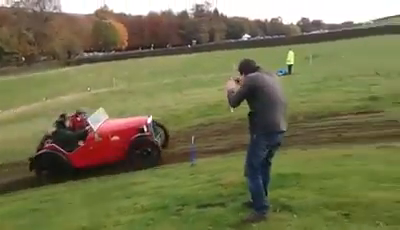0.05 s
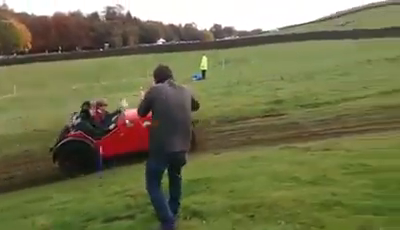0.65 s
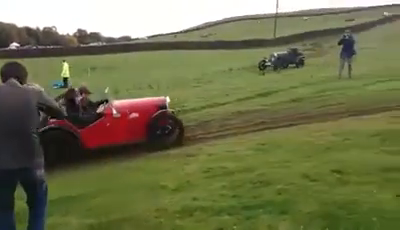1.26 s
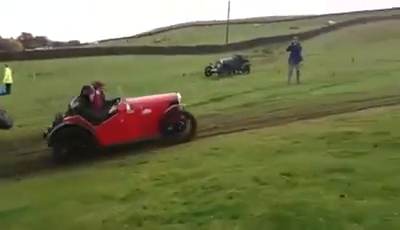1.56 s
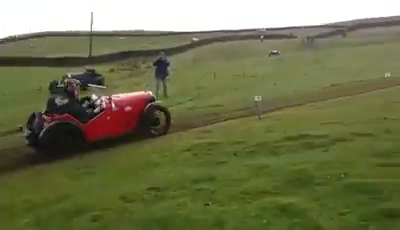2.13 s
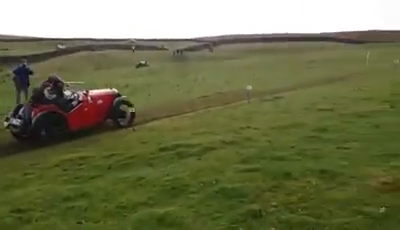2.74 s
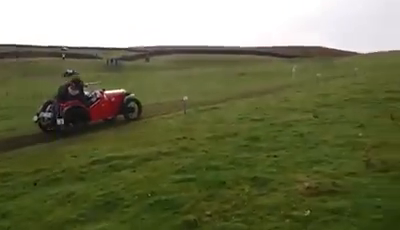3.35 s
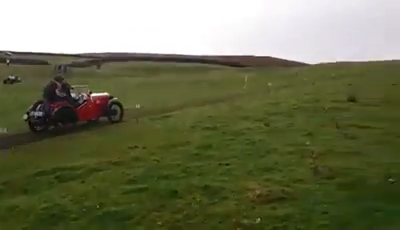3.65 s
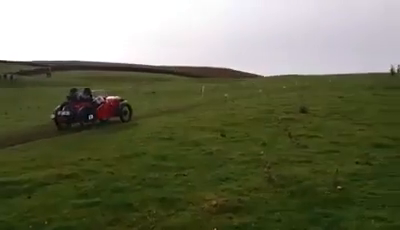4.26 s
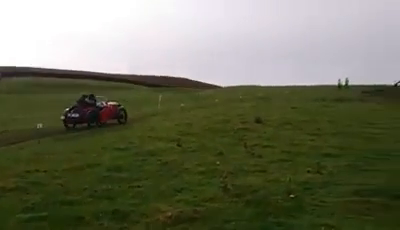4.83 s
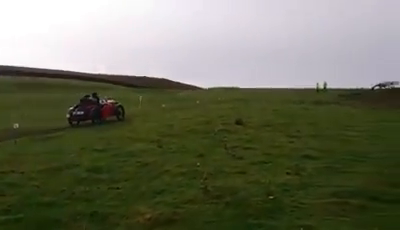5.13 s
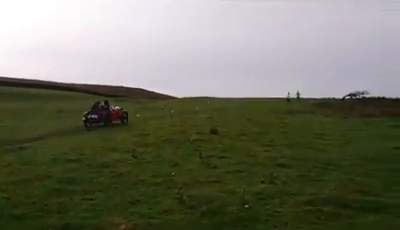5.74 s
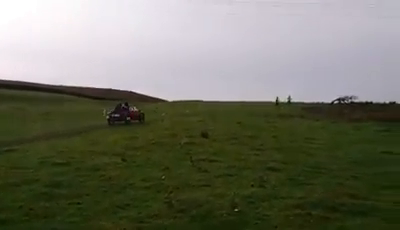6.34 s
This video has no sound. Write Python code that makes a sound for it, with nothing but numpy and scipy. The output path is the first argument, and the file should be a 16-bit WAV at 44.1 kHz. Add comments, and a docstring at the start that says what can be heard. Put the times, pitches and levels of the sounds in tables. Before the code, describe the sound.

A small vintage four-cylinder car is already at full throttle, climbing a muddy hill outdoors. Its exhaust booms, barks and rasps at a nearly steady pitch, with rushing gas and the hiss of flung mud. It passes closest at about 1 second, and loose metal buzzes strongly between 1 and 2.5 seconds. The low boom peaks around 2.5 seconds, then the car gradually draws away and the hiss and rasp fade. From 2.7 to 5.8 seconds, short, bright metal clanks come in irregular clusters. At about 5.4 seconds the driver eases off and the pitch drops, the engine running on more quietly until the end at 6.5 seconds. Behind it a dull second engine idles, revving gently around 5 seconds, over a faint murmur of far-off motors. Gusts rumble and thud on the hand-held stereo microphone, mostly on the right, at about 1, 2 and 3 seconds.

```python
"""A small vintage four-cylinder car climbs a muddy hill at full throttle, passes and draws away.
Its uneven firings boom, bark and rasp in the exhaust; near the end the driver eases off.
Gas rushes through the engine, spinning tyres fling mud, and loose metal buzzes and clanks.
Behind it a second engine idles, far-off motors murmur and gusts buffet a hand-held stereo microphone."""
import sys
import numpy as np
from scipy import signal
from scipy.fft import rfft, irfft
from scipy.io import wavfile

SR = 44100
rng = np.random.default_rng(int(sys.argv[2]) if len(sys.argv) > 2 else 0)


def transcribe(signal):
    """Save signal, clipped to [-1, 1], as a 16-bit WAV file at the path in sys.argv[1]."""
    frames = np.atleast_2d(signal).T
    limited = np.clip(frames, -1, 1)
    pcm = np.round(limited * 32767).astype(np.int16)
    wavfile.write(sys.argv[1], SR, pcm)


N = 286209
TIME, FREQ = np.arange(N) / SR, np.arange(N // 2 + 1) * SR / N


# How fast the engine runs; one cycle is four firings: (time [s], cycle rate [Hz])
ENGINE_SPEED = [(0.0, 39.46), (0.12, 39.65), (0.5, 37.86), (0.81, 38.23), (1.03, 37.58), (1.43, 39.41),
                (2.04, 39.1), (2.44, 38.58), (3.42, 39.54), (3.8, 38.76), (4.03, 39.04), (4.36, 38.13),
                (4.9, 38.87), (5.06, 38.08), (5.42, 37.9), (5.64, 34.62), (6.0, 35.62), (6.49, 36.6)]
def engine_cycles(wobble=0.00346):
    """Count the engine's cycles so far; its speed wobbles as the wheels grip and slip."""
    hz = curves(ENGINE_SPEED)[0] * (1 + wobble * wander(11.9))
    return np.cumsum(hz) / SR


# The four cylinders in firing order: (place in the cycle [0-1], strength [dB])
CYLINDERS = [(0.17, 0.5), (0.43, 6), (0.695, 3.2), (0.928, 1.5)]
def firings(cycles, jitter, scatter_db):
    """One pulse per firing, each a little early or late, weak or strong."""
    place, db = np.transpose(CYLINDERS)
    whole = np.arange(int(cycles[-1]))
    chance = rng.standard_normal((300, 2, len(place)))[:len(whole)]
    due = whole[:, None] + place + jitter * chance[:, 0]
    samples = np.interp(due, cycles, np.arange(N)).astype(int)
    return np.bincount(samples.ravel(), gain(db + scatter_db * chance[:, 1]).ravel(), N)


def harmonic(cycles, multiple, lean=0.3, pipe_lag=0.0069):
    """A pure tone at a multiple of the cycle rate, timed to the firings; the pipe delays higher ones."""
    place, db = np.transpose(CYLINDERS)
    timing = np.angle(gain(db) @ np.exp(-2j * np.pi * multiple * place))
    return -np.sqrt(2) * np.cos(2 * np.pi * multiple * cycles + timing + lean - pipe_lag * multiple ** 2)


# How strong the low exhaust note is: (time [s], boom level [dB], octave level [dB])
BOOM_LEVELS = [(0.0, -21.5, -34), (0.05, -22, -29), (0.25, -20.5, -37.5), (0.38, -24, -28),
               (0.63, -23, -32.5), (0.7, -24.5, -35.5), (0.98, -20.5, -23.5), (1.36, -24, -27.5),
               (1.81, -19.5, -29), (2.2, -19.5, -20.5), (2.4, -17, -24.5), (2.8, -17.5, -30),
               (3.99, -19, -35), (5.19, -24.5, -34), (5.71, -23.5, -39), (5.97, -23.5, -37),
               (6.44, -25, -38), (6.49, -26, -44)]
# Its tones, relative to the boom level, by the part of the car that is heard:
# (multiple of the cycle rate, front [dB], side [dB], tail [dB], burble boost [dB], throttle loss [dB])
BOOM_TONES = [(2, -26, -23, -22, -5, 8), (3, -21, -24, -20, -4, 7), (4, -3, 1.5, -1, 2, 0.5),
              (5, 3.5, -20.5, -10.5, -1, 0), (6, -19.5, -12, -23, 11, 9), (7, -16.5, -13, -32, -5, 9),
              (9, -15.5, -15.5, -29, 3.5, -1)]
def boom(cycles, views, waver_db=1.67, steady_db=0.53, octave_boost_db=1.5):
    """The exhaust booms at the firing rate and an octave up; unequal cylinders add the other tones."""
    boom_db, octave_db = curves(BOOM_LEVELS)
    burble = swell(1.35, 0.6)  # blooms as the car goes by
    count = len(CYLINDERS)
    out = gain(octave_db + octave_boost_db + steady_db * wander(33)) * harmonic(cycles, 2 * count)
    for multiple, *view_db, burble_db, ease_db in BOOM_TONES:
        db = boom_db + np.array(view_db) @ views + burble_db * burble - ease_db * throttle_eased()
        db += (waver_db if multiple % count else steady_db) * wander(33)
        out += gain(db) * harmonic(cycles, multiple)
    return out


def sputter(cycles, relative_db=-22):
    """No two firings are equally strong, so the exhaust gurgles around its note."""
    boom_db = curves(BOOM_LEVELS)[0]
    puffs = firings(cycles, jitter=0.0012, scatter_db=3.5) * wander(164)
    return gain(boom_db + relative_db) * normalise(filtered(puffs, band(74, 353)))


# The exhaust's middle tones: (multiple of the cycle rate, front [dB], side [dB], tail [dB])
BARK_TONES = [(10, -30, -1, -1), (11, -29, -6.5, -2.5), (12, -12, 1, -5.5), (13, -9, -8, -1),
              (14, -4.5, -3.5, -14), (15, -6.5, 1, -9.5), (16, -18, -2, -11), (17, -5, -1.5, -27),
              (18, -11, -16, -14), (19, 0, -3.5, 3), (20, -2.5, 2, 2.5), (21, -17, 0, -5),
              (22, -20, -11, -16), (23, 0, -6.5, -12), (24, -13.5, 3, -13)]
def bark(cycles, views, waver_db=1.55, pop_db=1.0, jitter=0.00071):
    """The middle tones join in a pitched pop at each firing, varying a little in strength and timing."""
    cycles = cycles + jitter * wander(57)
    pops = sum(gain(np.array(view_db) @ views + waver_db * wander(7.2)) * harmonic(cycles, multiple)
               for multiple, *view_db in BARK_TONES)
    db = passing_db(views, (-43, -39, -38.5), distance_db=25, ease_db=5.5, blocked_db=-0.5)
    return gain(db + pop_db * wander(62)) * pops


# The tone colour of the rasp: (frequency [Hz], front [dB], side [dB], tail [dB])
RASP_COLOUR = [(417, 8, 16.5, -31), (466, 2, 1, -24), (540, -9, 4, -6), (630, 1, 2, -8), (746, 3.5, 6, -5),
               (790, 3.5, -4, -8), (850, -3, 10, -9), (1006, 0, -1, -21), (1260, 13, -6, -6)]
def rasp(cycles, views, stray_db=-1, puff_s=0.0044, bass_delay_s=0.00038, waver_db=1.5):
    """A puff of gas follows each firing and rasps in the tailpipe."""
    pulses = firings(cycles, jitter=.002, scatter_db=1.5)
    fade = 1 / (1 + 2j * np.pi * FREQ * puff_s)  # gives each pulse a short tail
    puffs = np.sqrt(np.abs(filtered(pulses ** 2, fade)))
    gas, stray = (normalise(puffs * rng.standard_normal(N)) for _ in range(2))
    source = reflections(stereo(gas, gain(stray_db) * stray), share=0.32, drift_s=0.00055)
    # the silencer holds the low notes back, which softens each puff
    silencer = band(494, 1120) * np.exp(2j * np.pi * bass_delay_s * 700 * np.exp(-FREQ / 700))
    sound = sum(view * normalise(filtered(source, silencer * gain(spectrum(RASP_COLOUR, column))))
                for column, view in enumerate(views, 1))
    db = passing_db(views, (-36, -30.5, -27), distance_db=26, ease_db=7, blocked_db=2)
    return gain(db + waver_db * wander(42)) * sound


# Moments when the tailpipe sings: (middle [s], half length [s], level [dB])
PIPE_SWELLS = [(1.252, 0.25, -39), (4.0, 0.31, -42), (4.744, 0.58, -41.5)]
def pipe_song(cycles, multiple=19, waver_db=2.5, ease_db=5):
    """The pipe resonates with one of the engine's tones and sings on it."""
    strength = sum(gain(db) * swell(s, half_s) for s, half_s, db in PIPE_SWELLS)
    strength *= gain(waver_db * wander(41) - ease_db * throttle_eased())
    return strength * harmonic(cycles, multiple)


# The tone colour of rushing gas and flying mud: (frequency [Hz], front [dB], side [dB], tail [dB])
HISS_COLOUR = [(1103, 2.5, -5.5, 4.5), (1553, -24.5, 2, 0.5), (1554, -4.5, -2.5, 5), (2038, 2, 8, -5.5),
               (2154, -3, 3, -46), (2246, -16, 10, 3.5), (3060, -3.5, -4.5, -1.5), (3390, -13.5, 0, -1.5),
               (3950, -8.5, -8.5, -14.5), (5260, -10.5, -10.5, -10), (6200, -10.5, -11.5, -19.5),
               (7060, -10.5, -9, -16.5), (9730, -15.5, -16, -25.5), (14700, -33.5, -27, -38.5)]
def coloured_hiss(sound, views):
    """A hiss changes colour as the car shows its front, side and tail."""
    return sum(view * normalise(filtered(sound, ringing(gain(spectrum(HISS_COLOUR, column)))))
               for column, view in enumerate(views, 1))


def engine_rush(cycles, views, clatter_db=-7, flutter_db=-0.9, waver_db=1.02):
    """The air intake rasps once a cycle, the valves clatter and gas rushes."""
    noise = stereo_noise()
    clatter = stereo(*(normalise(firings(cycles - .66, jitter=.002, scatter_db=1.8)) for _ in range(2)))
    intake = filtered(noise * throb(cycles, 0.013, 0.26) + gain(clatter_db) * clatter, band(1084, 1740))
    pulsing = throb(cycles, 0.11, 0.04) * throb(4 * cycles, 1.0, 0.15) * gain(flutter_db * wander(66))
    gas = filtered(noise * pulsing + gain(clatter_db - 4.0) * clatter, band(2714, 3860))
    sound = reflections(intake + gas, share=0.24, drift_s=0.00017)
    db = passing_db(views, (-26.5, -23, -28.5), distance_db=20, ease_db=6, blocked_db=3.5)
    return gain(db + waver_db * wander(22)) * coloured_hiss(sound, views)


def mud_spray(cycles, views, spatter_db=1.22):
    """The tyres fling wet mud with a high, spattering hiss."""
    spatter = filtered(stereo_noise() * gain(spatter_db * wander(380)), band(3850, 14100))
    sound = reflections(spatter, share=0.27, drift_s=.00004) * throb(cycles, 0.14, 0.014)
    db = passing_db(views, (-29.5, -32, -32.5), distance_db=15, ease_db=7.5, blocked_db=6.5)
    return gain(db) * coloured_hiss(sound, views)


# Spells of buzzing metal: (middle [s], half length [s], pitch [Hz], level [dB])
BUZZES = [(0.098, 0.25, 1060, -34), (0.353, 0.12, 2680, -35), (1.2, 0.52, 1915, -29.5),
          (1.37, 0.17, 1550, -36), (1.555, 0.44, 802, -30), (1.758, 0.39, 2990, -38),
          (1.955, 0.37, 1016, -35), (2.263, 0.67, 2370, -38.5), (2.474, 0.54, 666, -34),
          (2.824, 0.079, 2410, -33.5), (3.15, 0.21, 1314, -40.5), (3.165, 0.71, 4420, -47),
          (3.805, 0.16, 1550, -40.5), (4.2, 0.58, 1650, -47), (4.251, 0.58, 2450, -40),
          (4.459, 0.06, 2380, -34), (4.6, 0.96, 773, -47.5), (4.78, 0.1, 3300, -41.5),
          (5.109, 0.064, 2990, -42.5), (5.8, 0.084, 2610, -49)]
def buzzes(cycles, chatter_db=2, width_hz=126):
    """Firings shake loose metal, which chatters once a cycle, swelling and fading at its own pitch."""
    bursts = throb(cycles, .05, 1.8) * gain(3.5 * np.tanh(wander(35)))
    knocks = normalise(firings(cycles - .66, jitter=.003, scatter_db=2))
    shake = knocks + gain(chatter_db) * normalise(bursts * rng.standard_normal(N))
    return sum(gain(db) * swell(s, half_s) * normalise(filtered(shake, resonance(hz, width_hz) ** 2))
               for s, half_s, hz, db in BUZZES)


# Single knocks of metal: (time [s], level [dB])
CLANKS = [(2.698, -22), (2.793, -20), (2.823, -23), (2.848, -18), (2.988, -25), (3.348, -29), (3.966, -28),
          (4.064, -26), (4.104, -27), (4.434, -29), (4.458, -34), (4.51, -35), (4.644, -27), (4.693, -28),
          (4.795, -33), (5.081, -26.5), (5.13, -30), (5.274, -30), (5.759, -37), (5.79, -35)]
# The tones each knock rings with: (pitch [Hz], relative level [dB])
CLANK_TONES = [(2450, 0.5), (2760, -10), (3300, -13)]
def clanks(rise_s=0.0017, ring_s=0.0062, detune=0.022):
    """Hard jolts make the loose metal strike; it rings briefly, never twice at quite the same pitch."""
    out = np.zeros(N)
    for s, db in CLANKS:
        near = np.abs(TIME - s) < .05
        strike = gain(db) * surge(s, rise_s, ring_s)[near]
        for hz, tone_db in CLANK_TONES:
            pitch = hz * (1 + detune * rng.standard_normal())
            out[near] += strike * gain(tone_db) * np.sin(2 * np.pi * pitch * (TIME[near] - s))
    return out


def throttle_eased():
    """How far the driver lets off the throttle, 0-1: a quick lift, then part of it fed back."""
    return surge(5.37, rise_s=0.23, fall_s=0.18, held=0.63)


# Which part of the car faces the microphone: (time [s], view [0 front, 1 side, 2 tail])
FACING = [(0, 0.45), (1.1, 0.53), (1.7, 0.69), (2.6, 1.26), (3.1, 1.37), (3.8, 1.65), (6.49, 1.42)]
def car_views():
    """The shares of front, side and tail that are heard as the car passes."""
    facing = np.clip(curves(FACING)[0], 0, 2)
    return np.array([np.maximum(1 - np.abs(facing - view), 0) for view in range(3)])


# The car strains and slackens over the ruts: (middle [s], half length [s], level change [dB])
STRAINS = [(.15, 0.46, 1.14), (1.776, 0.23, 1.6), (3.17, 0.2, -0.5), (3.445, 0.076, 1.5), (3.966, 0.18, 1),
           (4.975, 0.037, -2), (5.872, .1, 2)]
def passing_db(views, view_db, distance_db, ease_db, blocked_db):
    """Front, side and tail levels, blended; distance_db is lost at ten times the nearest distance."""
    nearest_s, nearest_m, speed_m_s = 0.84, 6.62, 4.56
    farther = np.hypot(1, speed_m_s * (TIME - nearest_s) / nearest_m)
    strain_db = sum(db * swell(s, half_s) for s, half_s, db in STRAINS)
    blocked = swell(0.8, 0.23)  # an onlooker hides the car for a moment
    loss_db = distance_db * np.log10(farther) + ease_db * throttle_eased() + blocked_db * blocked
    return np.array(view_db) @ views + strain_db - loss_db


def reflections(sound, share, drift_s, count=4):
    """Short echoes off the body, wheels and ruts slide as the car moves, shifting the colour."""
    out = sound
    for lag_s in np.geomspace(.0013, .0075, count):
        delayed = TIME - lag_s - drift_s * wander(1.47)
        out = out + share * np.array([np.interp(delayed, TIME, channel) for channel in sound])
    return out / np.sqrt(1 + count * share ** 2)


def idling_engine(idle_hz=44.2, rev_hz=5, idle_db=-40.5, louder_db=7.5):
    """A dull second engine idles some way off; late on it revs gently and grows louder."""
    hz = (idle_hz + rev_hz * swell(5.3, .7)) * (1 + 0.0303 * wander(9.9))
    db = idle_db + louder_db * swell(5.2, 1.2) + 2 * wander(12)
    angle = 2 * np.pi * np.cumsum(hz) / SR
    note = np.sin(angle) + gain(-5) * np.sin(2 * angle) + gain(-13) * np.sin(3 * angle)
    return gain(db) * np.sqrt(2) * note


# Gusts of wind: (start [s], relative level [dB], fade time [s])
GUSTS = [(1.12, -22, 1.4), (2.08, -20, 0.071), (3.0, -28, 0.96), (4.35, -45, 2.3), (5.7, -32, .5)]
# The tone colour of their rumble: (frequency [Hz], relative level [dB])
WIND_COLOUR = [(10, 1), (22, -5), (45, -8), (80, -8.5), (130, -20), (300, -18.5), (900, -62)]
# Small swirls of air: (time [s], relative level [dB], pitch [Hz])
SWIRLS = [(1.179, -15, 42), (1.235, -7, 29.69), (1.321, -14, 37), (1.441, -15, 28.6), (1.549, -16, 30.2),
          (2.14, -50, 47.83), (2.2, -20, 32), (3.08, -16, 55.4), (3.661, -19, 33.9), (4.47, -16, 41.9),
          (5.79, -13, 30)]
def wind(breeze_db=-65, rise_s=0.099, left_db=-16, right_db=2, thud_half_s=0.0084):
    """Wind rumbles and swirls thud on the microphone, both far more on the right."""
    force = gain(breeze_db) + sum(gain(db) * surge(s, rise_s, fall_s) for s, db, fall_s in GUSTS)
    colour = gain(spectrum(WIND_COLOUR)) * band(6.4, 2000, order=2)
    rumble = force * normalise(filtered(rng.standard_normal((2, N)), colour))
    thuds = sum(gain(db) * swell(s, thud_half_s) * np.sin(2 * np.pi * (hz * (TIME - s) + rng.random()))
                for s, db, hz in SWIRLS)
    return rumble * gain([[left_db], [right_db]]) + thuds * gain([[left_db - right_db], [0]])


# The tone colour of the far-off murmur: (frequency [Hz], relative level [dB])
MURMUR_COLOUR = [(20, -34), (50, 3), (95, 7.5), (200, -37), (400, -45), (1000, -18.5), (4000, -36),
                 (15000, -42)]
def distant_motors(db=-39):
    """Far-off motors murmur over open ground."""
    level = gain(db + 0.48 * wander(0.49))
    return level * normalise(filtered(stereo_noise(), gain(spectrum(MURMUR_COLOUR))))


# How much louder the left channel is: (frequency [Hz], left minus right [dB])
BALANCE = [(40, -7), (155, -3), (310, -6.5), (500, -3), (800, -3), (1300, -5), (2400, -5.5), (3400, -2),
           (4500, 3), (7000, 0), (8500, 2.5), (10000, 9), (14000, 6)]
def microphone(sound, case_hz=1980, case_width_hz=420, bass_lead=0.37):
    """Left and right differ in colour; the left leads in the bass and the case shifts its phase."""
    tilt = gain(spectrum(BALANCE) / 2)
    shift = (1 - 2 * resonance(case_hz, case_width_hz)) * np.exp(1j * bass_lead * band(30, 310, order=2))
    return filtered(sound, np.array([tilt * shift, 1 / tilt]) * 2 / (tilt + 1 / tilt))


# How alike left and right are: (frequency [Hz], likeness [0-1])
LIKENESS = [(400, 0.2), (800, 0.45), (1300, 0.028), (1900, 0.65), (2500, 1), (3400, 0.75), (5000, 0.27),
            (8000, 0.36), (11000, 0.054)]
def stereo(shared, other):
    """Both channels hear one sound; another reaches them with opposite signs and adds width."""
    alike = np.clip(spectrum(LIKENESS), 0, 1)
    width = np.array([[1], [-1]]) * filtered(other, np.sqrt((1 - alike) / 2))
    return filtered(shared, np.sqrt((1 + alike) / 2)) + width


def stereo_noise():
    """Hiss that is partly alike on left and right."""
    return stereo(*rng.standard_normal((2, N)))


def gain(db):
    """Turn decibels into a multiplier."""
    return 10 ** (np.asarray(db) / 20)


def normalise(x):
    """Scale to an average strength (rms) of 1."""
    return x / np.sqrt(np.mean(x ** 2))


def curves(table):
    """A table's columns, joined by straight lines in time."""
    s, *columns = np.transpose(table)
    return [np.interp(TIME, s, column) for column in columns]


def spectrum(table, column=1):
    """One column of a table, filled in at every frequency."""
    columns = np.transpose(table)
    return np.interp(np.log(FREQ + 1), np.log(columns[0]), columns[column])


def filtered(x, response):
    """Pass a sound through a filter."""
    return irfft(rfft(x) * response, N)


def ringing(gains):
    """A filter with these gains that rings only after it is struck."""
    cepstrum = irfft(np.log(gains + 1e-5), N)
    cepstrum[1:N // 2] *= 2
    cepstrum[N // 2:] = 0
    return np.exp(rfft(cepstrum))


def band(low_hz, high_hz, order=6):
    """A filter that keeps what lies between two frequencies."""
    return ((1 + (low_hz / (FREQ + 1)) ** (2 * order)) * (1 + (FREQ / high_hz) ** (2 * order))) ** -.5


def resonance(hz, width_hz):
    """A filter that rings at one pitch."""
    return 1j * FREQ * width_hz / (hz ** 2 - FREQ ** 2 + 1j * FREQ * width_hz)


def wander(rate_hz):
    """A smooth random drift, about 1 in size."""
    return normalise(filtered(rng.standard_normal(N), np.exp(-(FREQ / rate_hz) ** 2)))


def throb(cycles, place, sharpness):
    """A swell once per cycle, centred on a place in it."""
    return normalise(np.exp(sharpness * np.cos(2 * np.pi * (cycles - place))))


def swell(middle_s, half_s):
    """A smooth rise to 1 and fall."""
    return np.exp(-((TIME - middle_s) / half_s) ** 2)


def surge(start_s, rise_s, fall_s, held=0):
    """A straight rise to 1, then a fade towards a held share."""
    since = TIME - start_s
    fade = np.exp(-np.maximum(since - rise_s, 0) / fall_s)
    return np.clip(since / rise_s, 0, 1) * (held + (1 - held) * fade)


def scene(sway_db=-0.2):
    """The car passes in front of the idling engine, distant motors and wind."""
    cycles, views = engine_cycles(), car_views()
    sway = gain(sway_db * wander(0.84) * np.array([[.5], [-.5]]))  # the microphone turns a little
    drone = (boom(cycles, views) + sputter(cycles)) * sway
    tailpipe = rasp(cycles, views) + bark(cycles, views) + pipe_song(cycles)
    running = engine_rush(cycles, views) + mud_spray(cycles, views) + buzzes(cycles) + clanks()
    return microphone(drone + tailpipe + running + idling_engine() + distant_motors()) + wind()


def record(dry, top_hz=14800):
    """The highest treble is cut off."""
    return signal.sosfilt(signal.ellip(8, .2, 70, top_hz, fs=SR, output="sos"), dry)


dry = scene()
out = record(dry)
transcribe(out)
```